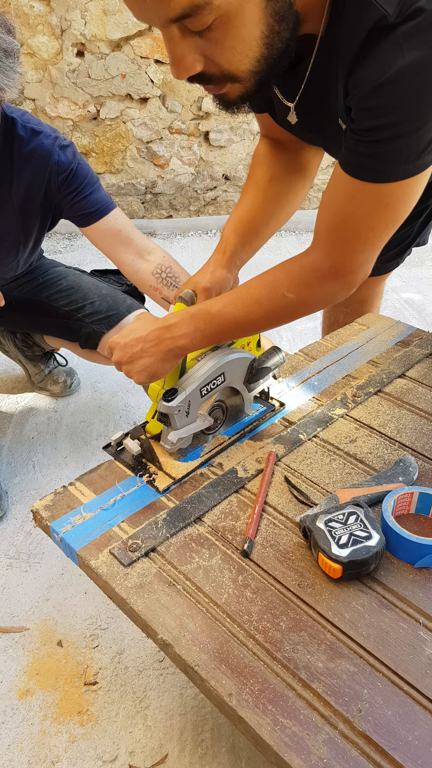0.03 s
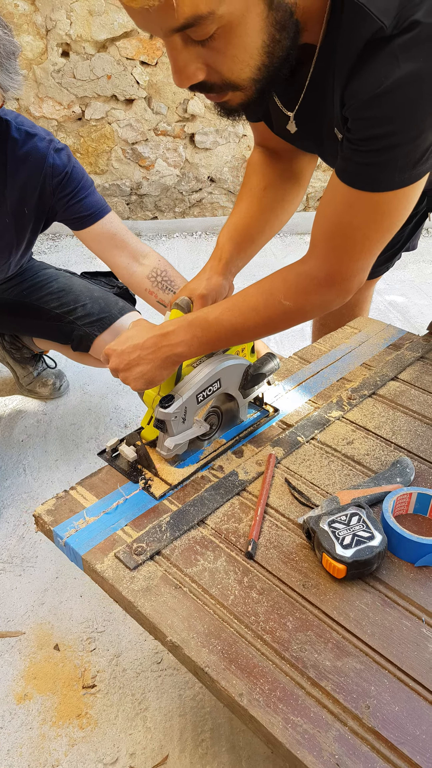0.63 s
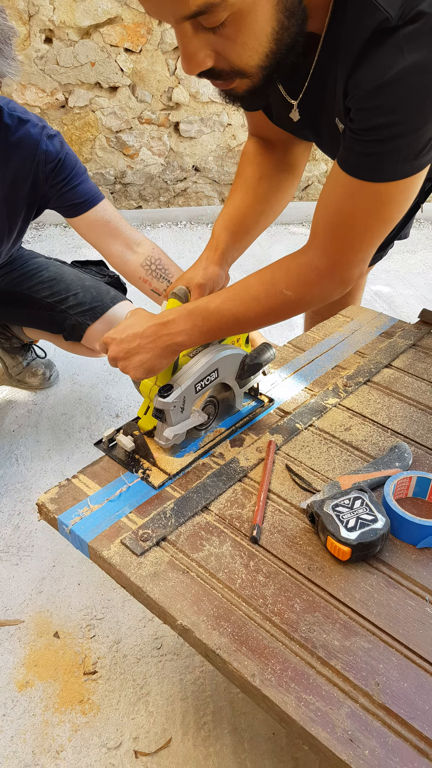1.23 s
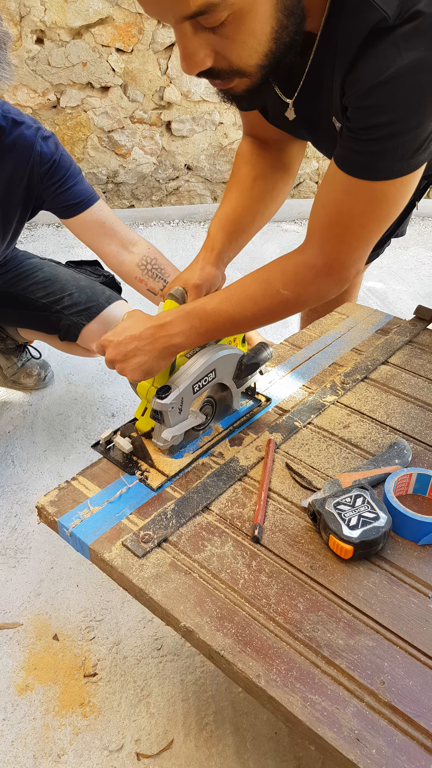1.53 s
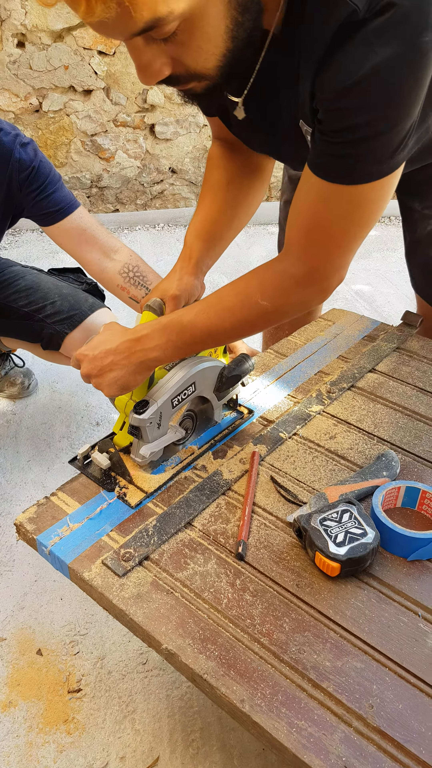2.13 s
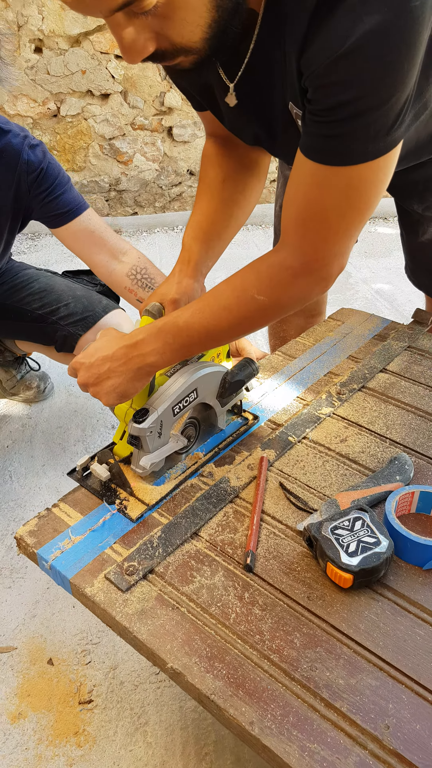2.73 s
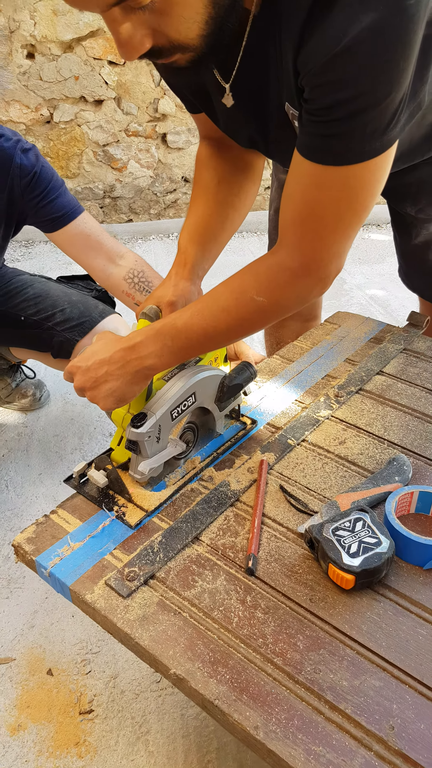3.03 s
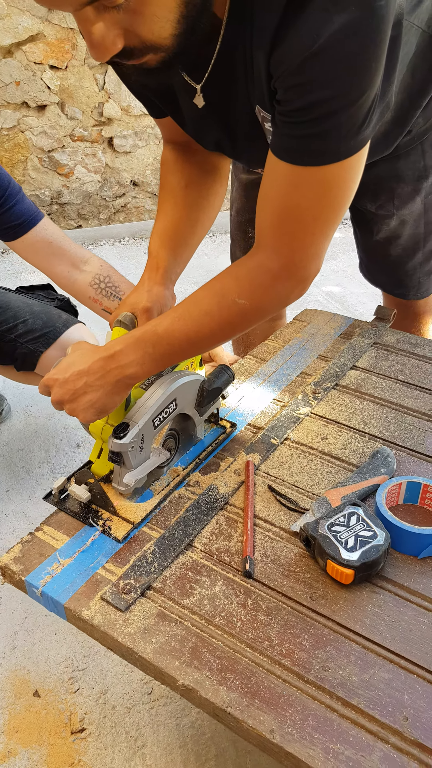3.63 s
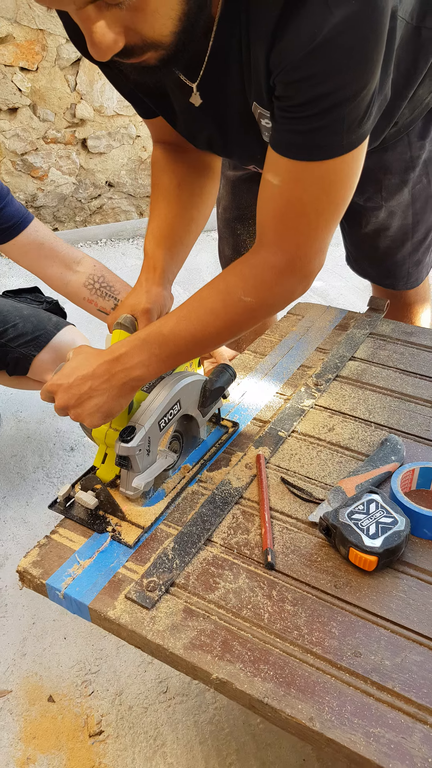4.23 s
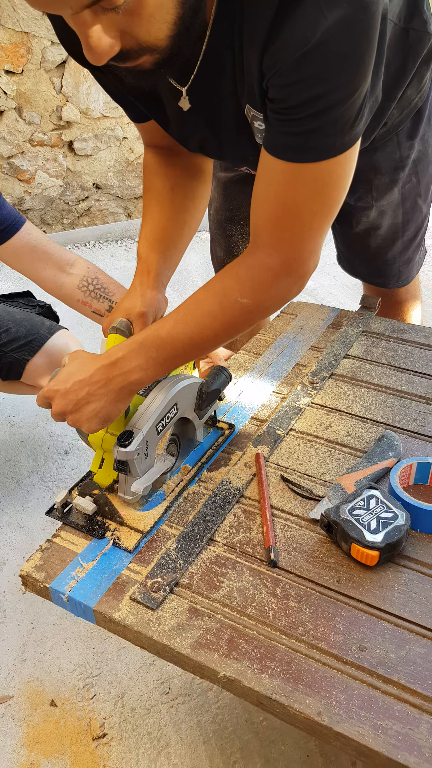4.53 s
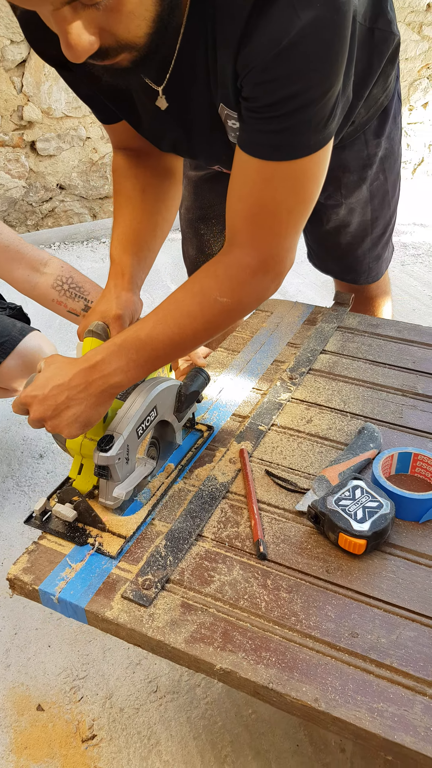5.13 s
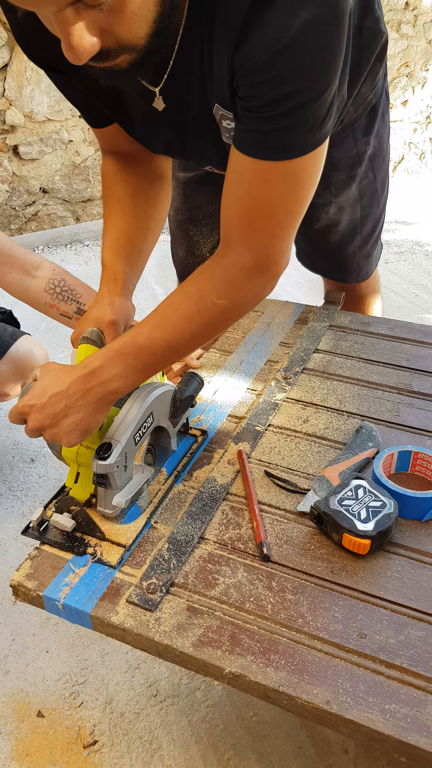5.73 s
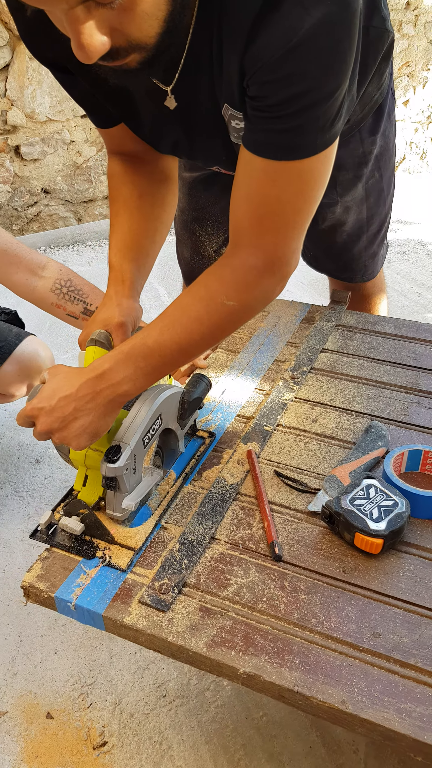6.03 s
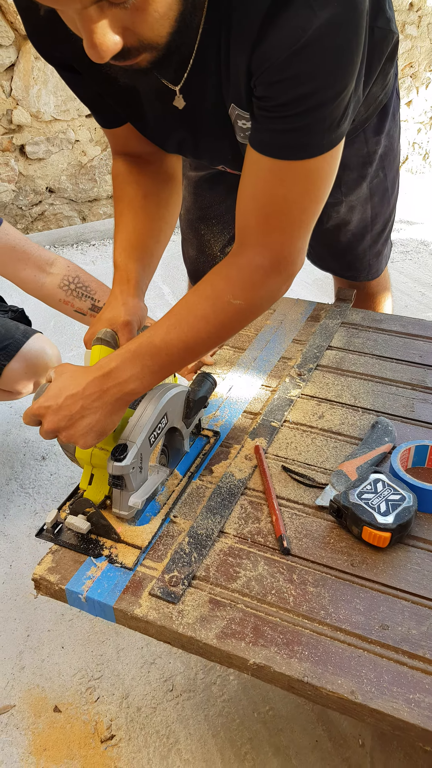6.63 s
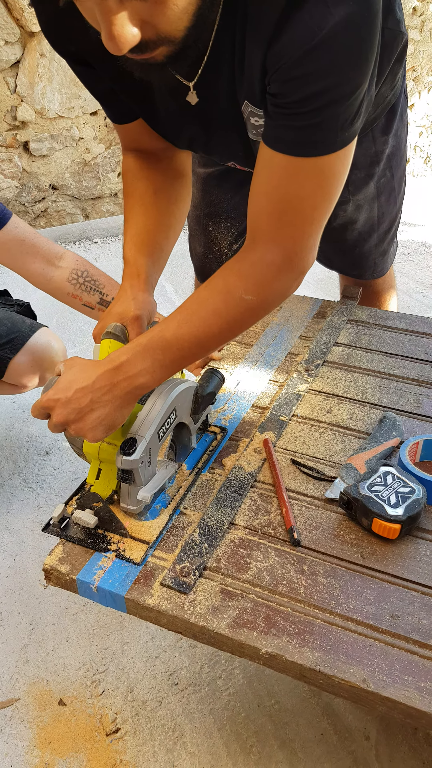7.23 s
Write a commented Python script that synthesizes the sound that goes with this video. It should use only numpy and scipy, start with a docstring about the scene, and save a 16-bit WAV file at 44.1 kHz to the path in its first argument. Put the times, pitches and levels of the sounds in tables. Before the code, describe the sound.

A cordless circular saw cuts through a wooden panel, close to the microphone in an open yard. It is already in the wood at the start and never stops. A ringing, knocking whine sits over the rasp of tearing fibres and a bright steel hiss, with a low drone beneath. Squeals come and go, the blade scrapes briefly a few times, and the pitch dips and recovers slightly.

```python
"""A whining, knocking ring, close by in an open yard: a cordless circular saw is cutting a wooden panel.
Its 18 teeth excite wood and steel periodically, unevenly around each turn, so whine, growl and spells
of squeal lie on harmonics of the blade speed. Torn fibres give a rasping noise that drives the
resonances of sole plate, guard and blade; the steel sizzles, hisses and now and then rubs the kerf.
The blade slows and recovers with the feed, and the panel's drone and the geared motor hum underneath."""
import sys
import numpy as np
from scipy import signal
from scipy.fft import rfft, irfft
from scipy.io import wavfile
from scipy.ndimage import uniform_filter1d, map_coordinates

SR = 44100
rng = np.random.default_rng(int(sys.argv[2]) if len(sys.argv) > 2 else 0)


def wav_out(sig):
    """Save sig, one row per channel (or a flat mono array), as 16-bit PCM at SR to the path in sys.argv[1]."""
    wavfile.write(sys.argv[1], SR, np.round(np.clip(np.atleast_2d(sig).T, -1, 1) * 32767).astype(np.int16))


N = 330750
TIME, HZ = np.arange(N) / SR, np.maximum(np.arange(N // 2 + 1) * SR / N, 1)
TEETH, GEAR_RATIO = 18, 14 / 3


# Uneven tooth heights. Each row: multiple of the blade speed, level in dB against the chip noise.
UNEVEN_TEETH = [(22, -29), (23, -30.5), (24, -30.5), (26, -29)]
# Broad response of the sole plate. Each row: frequency in Hz, relative gain in dB.
PLATE_COLOUR = [(800, -40), (1200, -10), (1500, -38), (2100, -32)]
# Modes of the sole plate. Each row: frequency in Hz, bandwidth in Hz, relative gain in dB.
PLATE_MODES = [(1464.6, 59, 9), (1537, 130, -1.5), (1667, 380, -0.5)]

def knock(turns):
    """Forced vibration: the proudest teeth hammer the sole plate; in spells a squeal shares the power."""
    force = chips(turns, memory=31, repeat=0.48, wobble_db=0.1, tooth_db=4.5)
    force[0] += tones(turns + .003 * drift(12), UNEVEN_TEETH, waver_db=3, waver_rate=5)
    plate = body(force, PLATE_COLOUR, PLATE_MODES, modes_db=20, wander_db=2, wander_rate=1.2)
    plate = evened(band(plate, 1405, 1780) + from_db(-18) * plate)
    plate[0] += squeals(turns)
    return evened(plate)


# Spells of squeal. Each row: start and end in seconds, multiple of the blade speed,
# level in dB against the knock.
SQUEALS = [(0.0, 0.06, 27, -2), (0.15, 1.18, 24, -3), (0.5, 1.25, 23, -2), (1.29, 2.16, 23, 2),
           (1.6, 2.14, 30, -6), (1.93, 2.12, 43, -9), (2.19, 2.43, 24, 4), (2.45, 3.85, 23, -2),
           (2.45, 3.1, 24, -4), (3.3, 3.7, 22, -2), (4.1, 4.82, 27, -6), (4.11, 4.76, 24, -1),
           (5.88, 6.45, 23, -4), (6.57, 6.92, 24, 0), (6.98, 7.35, 23, -5)]
SQUEAL_WAVER_DB, SQUEAL_JITTER_CYCLES, SQUEAL_FADE_S = 2.5, 0.11, 0.066

def squeals(turns):
    """Regenerative chatter: the blade follows the ripple left a turn earlier and locks to the spin."""
    out = np.zeros(N)
    for start, end, multiple, db in SQUEALS:
        held = np.clip(np.minimum(TIME - start, end - TIME) / SQUEAL_FADE_S + .5, 0, 1)
        cycles = multiple * turns + rng.random() + SQUEAL_JITTER_CYCLES * drift(18)
        gain = held * from_db(db + SQUEAL_WAVER_DB * drift(3.9))
        out += gain * np.sqrt(2) * np.cos(2 * np.pi * cycles)
    return out


# One spell of throbbing: start and end in seconds, nominal depth in dB.
THROB = (5.5, 6.4, 3.8)

def throb(turns):
    """Subharmonic modulation, as a gain: under light feed the teeth catch on about every second turn."""
    start, end, depth_db = THROB
    held = np.clip(np.minimum(TIME - start, end - TIME) / .1, 0, 1)
    catching = np.cos(np.pi * turns + 1.5 * drift(10)) + .4 * drift(20)
    gain = from_db(depth_db * held * catching)
    return evened(gain[None])[0]


# Strength of the tooth whine. Each row: time in seconds, level in dB.
WHINE_LEVEL = [(0.0, -23.5), (0.1, -29.5), (0.45, -31.5), (0.68, -41), (1.12, -46), (1.25, -31.5),
               (1.98, -46.5), (2.26, -32.5), (2.57, -45), (2.69, -30), (3.55, -37), (3.82, -28),
               (4.58, -30.5), (4.7, -35.5), (5.7, -37.5), (6.28, -33), (6.66, -46), (7.14, -34), (7.5, -38)]

def whine(turns):
    """Periodic excitation: successive tooth strikes make a tone at the tooth-passing frequency."""
    whine_db, = in_time(WHINE_LEVEL)
    return from_db(whine_db) * tones(TEETH * turns, [(1, 0)], waver_db=1.8, waver_rate=74)


# Overtones of the whine. Each row: multiple of the tooth rate, relative level in dB.
WHINE_OVERTONES = [(2, -23), (4, -22), (6, -23)]

def whine_overtones(turns):
    """Harmonic series: the tooth strikes also sound at even multiples of their rate."""
    return tones(TEETH * turns, WHINE_OVERTONES, waver_db=-1.0, waver_rate=10)


# Spectrum of tearing fibres. Each row: frequency in Hz, relative gain in dB.
FIBRE_COLOUR = [(1500, -9), (1900, 0), (2450, -5), (3450, -5.5), (4500, -2.5), (5450, -4), (8750, -4.5),
                (9500, -5), (11000, -36)]
# Higher modes of the guard. Each row: frequency in Hz, bandwidth in Hz, relative gain in dB.
GUARD_HIGH_MODES = [(2700, 90, -12), (2950, 34, -7), (4620, 240, -11), (6070, 45, -7)]

def rasp(turns):
    """Broadband excitation: fibres tear in the kerf and set the guard ringing."""
    flicker = from_db(0.65 * drift(14.3))
    force = chips(turns, memory=14, repeat=.42, wobble_db=.55, tooth_db=2)
    tearing = body(force, FIBRE_COLOUR, GUARD_HIGH_MODES, modes_db=1.0, wander_db=1.2, wander_rate=4.2)
    return flicker * evened(band(tearing, 1270, 8570))


# Spectrum of flank friction. Each row: frequency in Hz, relative gain in dB.
SIZZLE_COLOUR = [(8000, -27), (9500, -6), (10500, 0), (13200, -1), (14250, -3.5), (15800, -7.5)]
# High modes of the blade. Each row: frequency in Hz, bandwidth in Hz, relative gain in dB.
BLADE_HIGH_MODES = [(11820, 180, 1.5), (13170, 290, 2), (13600, 200, 1), (15060, 350, 3.5), (15270, 130, 4)]
# Strength of the sizzle. Each row: time in seconds, relative levels of the lower and upper band in dB.
SIZZLE_LEVEL = [(0.0, -27, -22), (0.08, -28.5, -26.5), (1.2, -24.5, -28), (1.67, -30, -31),
                (2.53, -25, -26), (2.8, -27, -25.5), (3.2, -30, -28), (4.25, -26, -26.5),
                (4.85, -30.5, -28), (5.5, -30, -24), (5.97, -31, -28.5), (6.1, -32.5, -29.5),
                (7.31, -29, -32.5)]
SIZZLE_SPLIT_HZ, SIZZLE_GAIN_DB = 13200, 2.5

def sizzle(turns):
    """Frictional excitation: the flanks rub the kerf and the blade's high modes sing in two bands."""
    force = chips(turns, memory=6, repeat=0.25, wobble_db=0.8, tooth_db=1.5)
    steel = body(force, SIZZLE_COLOUR, BLADE_HIGH_MODES, modes_db=-8, wander_db=2.6, wander_rate=1.8)
    spectrum = rfft(steel)
    upper_share = .5 + .5 * np.tanh((HZ - SIZZLE_SPLIT_HZ) / 500)
    lower = evened(irfft(spectrum * (1 - upper_share), N))
    upper = evened(irfft(spectrum * upper_share, N))
    lower_db, upper_db = in_time(SIZZLE_LEVEL)
    return from_db(SIZZLE_GAIN_DB) * (from_db(lower_db) * lower + from_db(upper_db) * upper)


# Main modes of the blade. Each row: frequency in Hz, bandwidth in Hz, relative gain in dB.
BLADE_MAIN_MODES = [(4017, 340, 1.5), (4685, 420, -3)]

def blade_ring(turns):
    """Plate resonance: the cut keeps the steel disc ringing in its main modes."""
    return resonance(turns, BLADE_MAIN_MODES)


# Bands of the blade's hiss. Each row: frequency in Hz, bandwidth in Hz, relative gain in dB.
HISS_BANDS = [(6630, 90, -6), (6965, 170, -4), (6950, 800, 0)]
# Strength of the hiss. Each row: time in seconds, level in dB.
HISS_LEVEL = [(0, -39), (1.2, -31.5), (1.8, -36.5), (2.5, -33), (4.4, -35), (5.3, -38.5), (6.1, -40),
              (7.0, -33)]

def hiss(turns):
    """Narrowband noise: the spinning blade hisses continuously near 7 kHz."""
    hiss_db, = in_time(HISS_LEVEL)
    return from_db(hiss_db) * resonance(turns, HISS_BANDS)


# Rubs on the kerf wall. Each row: time of the peak in seconds, half length in seconds, peak level in dB.
RUBS = [(1.17, 0.12, -35), (2.2, 0.2, -37), (2.52, 0.041, -30.5), (4.28, 0.15, -32.5), (7.0, 0.076, -34)]
# Modes that ring in a rub. Each row: frequency in Hz, bandwidth in Hz, relative gain in dB.
RUB_MODES = [(4400, 1100, -7), (7000, 1100, -3)]

def rubs(turns):
    """Sliding friction: the flank touches the kerf wall in shrill scrapes that swell and fade."""
    contact = sum(from_db(db) * np.exp(-((TIME - peak_s) / half_s) ** 2) for peak_s, half_s, db in RUBS)
    return contact * resonance(turns, RUB_MODES)


# Main mode of the guard. The row: frequency in Hz, bandwidth in Hz, relative gain in dB.
GUARD_MAIN_MODE = [(2027, 77, 0)]
# Strength of that mode. Each row: time in seconds, level in dB.
GUARD_LEVEL = [(0.17, -32), (0.3, -38), (1.1, -36), (1.55, -44), (3.3, -40), (4.25, -35), (4.5, -37),
               (5.1, -39.5), (5.35, -38), (5.9, -38.5), (6.1, -42), (6.4, -38)]

def guard_ring(turns):
    """Resonance: the guard picks a band near 2 kHz out of the chip noise, wavering in level."""
    guard_db, = in_time(GUARD_LEVEL)
    return from_db(guard_db + 1.4 * drift(12)) * resonance(turns, GUARD_MAIN_MODE)


# Harmonics of the blade's runout. Each row: multiple of the blade speed, relative level in dB.
RUNOUT = [(10, -18), (11, -15.5), (12, -14), (13, -16), (15, -8), (16, -7.5)]
# Strength of the growl. Each row: time in seconds, relative level in dB.
GROWL_LEVEL = [(0, -41), (0.7, -40.5), (1.8, -44), (2.85, -39.5), (3.6, -41.5), (4.1, -49), (5.8, -52),
               (6.5, -42.5), (7.5, -46)]

def growl(turns):
    """Periodic forcing: the blade runs out of true and drives the panel at harmonics of its spin."""
    growl_db, = in_time(GROWL_LEVEL)
    return from_db(growl_db) * tones(turns, RUNOUT, waver_db=3, waver_rate=9.1)


# Broad response of the panel. Each row: frequency in Hz, relative gain in dB.
WOOD_COLOUR = [(30, -20), (60, -6), (460, -5.5), (720, 0), (860, -3.5), (1020, 9), (1300, 10)]

def drone(turns):
    """Forced vibration: the feed and the blade's imbalance shake the whole panel."""
    force = chips(turns, memory=15, repeat=.3, wobble_db=1, tooth_db=1)
    force[0] += tones(turns, [(2, -26), (3, -28.5), (6, -29)], waver_db=3, waver_rate=5)
    return evened(band(coloured(force, WOOD_COLOUR), 12, 1170))


# Main mode of the panel. The row: frequency in Hz, bandwidth in Hz, relative gain in dB.
PANEL_MODE = [(560.4, 42, -1)]

def panel_ring(turns):
    """Resonance: the cut keeps one low mode of the wooden panel sounding."""
    return resonance(turns, PANEL_MODE)


# Motor and gear mesh. Each row: multiple of the motor speed, relative level in dB.
MOTOR_ORDERS = [(1, -1), (2, -23), (9, -26)]
# Strength of the hum. Each row: time in seconds, relative level in dB.
HUM_LEVEL = [(0.0, -55), (0.3, -49), (1.3, -56), (1.65, -53), (3.2, -53.5), (3.65, -49), (5.3, -58),
             (7.1, -59), (7.35, -51)]

def motor_hum(turns):
    """Shaft harmonics: motor and gear mesh hum at multiples of a speed geared to the blade's."""
    hum_db, = in_time(HUM_LEVEL)
    return from_db(hum_db) * tones(GEAR_RATIO * turns, MOTOR_ORDERS, waver_db=1.5, waver_rate=11)


def reflections(x, echo_db, t60, count, size=3000):
    """Early reflections from panel, arms and floor; `count` patterns cross-fade as the saw advances."""
    out = x
    for centre in np.linspace(0, N / SR, count):
        echoes = rng.standard_normal((2, size)) * from_db(-60 * TIME[:size] / t60)
        echoes /= np.linalg.norm(echoes, axis=1, keepdims=True)
        nearness = np.sqrt(np.maximum(1 - abs(TIME - centre) * (count - 1) * SR / N, 0))
        out = out + from_db(echo_db) * signal.oaconvolve(x * nearness, echoes, axes=1)[:, :N]
    return out / np.sqrt(1 + from_db(echo_db) ** 2)


# Likeness of the two ears. Each row: frequency in Hz, squared coherence (held within 0.01-0.99 in use).
EAR_COHERENCE = [(60, 0.2), (1200, 0), (2400, .5), (5000, -0.3), (15000, -0.5)]
# Level difference between the ears. Each row: frequency in Hz, left minus right in dB.
EAR_BALANCE = [(60, -4.5), (1150, -4), (1600, -8), (2700, -4), (4200, -4), (6600, -11), (8600, -3.5),
               (10500, -2), (15000, -11)]
LEFT_LAG_S = .00005

def place(streams):
    """Interaural cues: stream 0 comes direct from the right, stream 1 off panel, floor and wall."""
    direct, scattered = rfft(streams)
    coherence = np.sqrt(np.clip(over_hz(EAR_COHERENCE), .01, .99))
    direct = direct * np.sqrt((1 + coherence) / 2)
    scattered = scattered * np.sqrt((1 - coherence) / 2)
    lean = from_db(over_hz(EAR_BALANCE) / 2)
    left = (direct + scattered) * lean * np.exp(-2j * np.pi * HZ * LEFT_LAG_S)
    right = (direct - scattered) / lean
    return irfft(np.array([left, right]), N)


def chips(turns, memory, repeat, wobble_db, tooth_db, size=700):
    """Cyclostationary tearing noise, two streams: a share `repeat` recurs for about `memory` turns."""
    keep = np.exp(-1 / memory)
    fresh = rng.standard_normal((2, 700, size))  # stream, turn, angle around the blade
    recurring = signal.lfilter([1], [1, -keep], fresh, axis=1)[:, 150:].reshape(2, -1)
    recurring = np.array([map_coordinates(stream, [turns * size], order=3) for stream in recurring])
    noise = np.sqrt(repeat) * rms_one(recurring) + np.sqrt(1 - repeat) * rng.standard_normal((2, N))
    # each tooth pulses the noise, and the blade, slightly out of true, bites harder once a turn
    pulse_db = wobble_db * np.cos(2 * np.pi * turns) + tooth_db * np.cos(2 * np.pi * TEETH * turns)
    return rms_one(noise * from_db(pulse_db))


def tones(turns, orders, waver_db, waver_rate):
    """Harmonic synthesis: sines locked to a rotation, each wavering in level."""
    return sum(np.sqrt(2) * from_db(db + waver_db * drift(waver_rate)) * np.cos(2 * np.pi * k * turns)
               for k, db in orders)


def body(force, colour, modes, modes_db, wander_db, wander_rate):
    """Modal superposition: a broad response plus modes whose strengths wander as the contact moves."""
    out = coloured(force, colour)
    for hz, width, db in modes:
        radius = np.exp(-np.pi * width / SR)
        feedforward = np.array([1, 0, -1]) * (1 - radius ** 2) / 2
        feedback = [1, -2 * radius * np.cos(2 * np.pi * hz / SR), radius ** 2]
        ring = signal.lfilter(feedforward, feedback, force)
        out = out + ring * from_db(db + modes_db + wander_db * drift(wander_rate))
    return evened(out)


def resonance(turns, modes):
    """Noise-driven resonance: narrow bands kept ringing by chips that partly recur each turn."""
    force = chips(turns, memory=10, repeat=.45, wobble_db=.7, tooth_db=1)
    return evened(sum(from_db(db) * band(force, hz - width / 2, hz + width / 2, order=2)
                      for hz, width, db in modes))


def coloured(x, colour):
    """Spectral shaping by a curve of gains in dB."""
    return irfft(rfft(x) * from_db(over_hz(colour)), N)


def band(x, low_hz, high_hz, order=3):
    """Band-pass filtering keeps the range that a part radiates well."""
    return signal.sosfilt(signal.butter(order, [low_hz, high_hz], "band", fs=SR, output="sos"), x)


def drift(rate):
    """Low-pass noise of unit power, with its corner at `rate` Hz."""
    pole = np.exp(-200 * np.pi * rate / SR)  # one step per 100 samples
    slow = signal.lfilter([1], [1, -2 * pole, pole ** 2], rng.standard_normal(N // 100 + 2002))[2000:]
    return np.interp(np.arange(N) / 100, np.arange(len(slow)), rms_one(slow))


def evened(x, size=5001):
    """Running normalisation holds the direct stream at unit power; fast flutter stays."""
    return x / np.sqrt(uniform_filter1d(x[0] ** 2, size) + 1e-12)


def rms_one(x):
    """Normalisation to unit mean power."""
    return x / np.sqrt(np.mean(x ** 2) + 1e-20)


def from_db(db):
    """Amplitude ratio from decibels."""
    return 10 ** (np.asarray(db) / 20)


def in_time(rows):
    """Linear interpolation of each column of a time table at every sample."""
    seconds, *columns = np.transpose(rows)
    return [np.interp(TIME, seconds, column) for column in columns]


def over_hz(points):
    """Interpolation of a spectrum on a logarithmic frequency axis."""
    hz, value = np.transpose(points)
    return np.interp(np.log(HZ), np.log(hz), value)


# Response of each part to the cut. Each entry: level in dB at the usual drive and speed,
# dB per dB of drive, dB per turn per second that the blade slows.
LOAD_RESPONSE = { "drone": (-40.5, 0.65, 0.11), "panel": (-54, 1.7, 0.8), "rasp": (-28.5, 0.64, 0.041),
                 "blade": (-34.5, 1.3, -0.18)}
USUAL_DRIVE_DB, USUAL_TURNS_PER_S = -29, 63

def load_gain(part, drive_db, speed):
    """Power law: a part grows louder with its drive, and its level shifts as the blade labours."""
    usual_db, per_drive, per_slowing = LOAD_RESPONSE[part]
    slowing = USUAL_TURNS_PER_S - speed
    return from_db(usual_db + per_drive * (drive_db - USUAL_DRIVE_DB) + per_slowing * slowing)


# Rotation of the blade. Each row: time in seconds, speed in turns per second.
BLADE_SPEED = [(0.0, 61.7), (0.11, 62.25), (0.18, 61.95), (0.27, 62.7), (0.34, 62.5), (0.52, 63.1),
               (0.74, 65.6), (1.05, 65.8), (1.2, 64.5), (1.42, 63.7), (1.65, 65.2), (2.34, 63.1),
               (2.6, 63.5), (2.71, 63.0), (2.78, 63.3), (2.88, 62.65), (2.99, 63.7), (3.61, 64.8),
               (3.89, 62.6), (4.13, 61.35), (4.55, 61.3), (4.72, 60.45), (4.97, 62.7), (5.5, 65.1),
               (5.72, 63.5), (6.33, 63.2), (6.5, 62.3), (6.81, 62.3), (7.14, 63.9), (7.32, 62.1),
               (7.5, 62.8)]
# How hard the teeth bite. Each row: time in seconds, drive in dB.
BITE = [(0.0, -24.5), (0.3, -28), (0.82, -24), (1.7, -30.5), (2.2, -27), (2.5, -30.5), (3.2, -31),
        (4.22, -26), (4.9, -32.5), (6.2, -35.5), (6.5, -32.5), (7.3, -30.5), (7.5, -38)]
# Strength of the sole plate's knock and squeal. Each row: time in seconds, level in dB.
KNOCK_LEVEL = [(0.03, -23), (0.08, -29.5), (0.2, -27), (0.42, -29), (0.5, -25.5), (1.18, -24.5),
               (1.25, -28), (1.57, -27.5), (1.7, -30.5), (2.05, -27.5), (2.17, -29), (2.28, -25),
               (2.55, -30), (2.88, -28), (3.3, -29.5), (3.95, -29), (4.2, -27.5), (4.68, -26),
               (5.15, -34.5), (5.35, -31.5), (5.85, -35), (6.3, -33), (6.48, -30), (6.93, -32.5),
               (7.05, -30.5)]
GRAIN_DB, GRAIN_HZ = 0.8, 5.7  # hard and soft fibres vary the bite and the sizzle

def scene():
    """Superposition: one shaft times every layer; load and level curves set their strengths."""
    speed, = in_time(BLADE_SPEED)
    turns = np.cumsum(speed * (1 + 0.002 * drift(13))) / SR
    grain_db = GRAIN_DB * drift(GRAIN_HZ)
    bite_db = in_time(BITE)[0] + grain_db
    knock_db, = in_time(KNOCK_LEVEL)
    rasp_gain = load_gain("rasp", bite_db, speed)

    wood = from_db(knock_db) * knock(turns) * throb(turns)
    wood += load_gain("drone", bite_db, speed) * drone(turns)
    wood += load_gain("panel", knock_db, speed) * panel_ring(turns)
    wood[0] += growl(turns) + whine(turns) + motor_hum(turns)  # tones join the direct stream only

    steel = from_db(grain_db) * sizzle(turns)
    steel += rasp_gain * rasp(turns) + guard_ring(turns)
    steel += load_gain("blade", bite_db, speed) * blade_ring(turns)
    steel += hiss(turns) + rubs(turns)
    steel[0] += rasp_gain * from_db(5.0) * whine_overtones(turns)
    return place(wood) + reflections(place(steel), echo_db=-1.0, t60=0.076, count=20)


CUTOFF_HZ = 15780

def record(dry):
    """Band limiting: a steep elliptic low-pass removes the highest treble."""
    return signal.sosfilt(signal.ellip(12, .1, 80, CUTOFF_HZ, fs=SR, output="sos"), dry)


dry = scene()
out = record(dry)
wav_out(out)
```